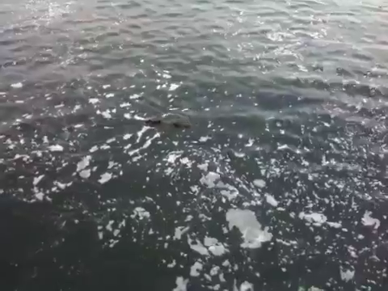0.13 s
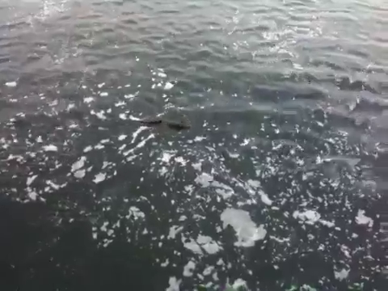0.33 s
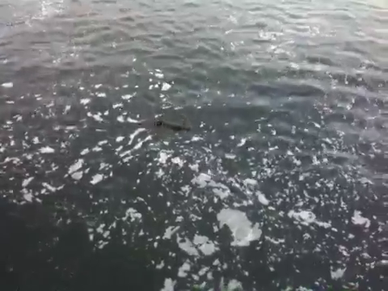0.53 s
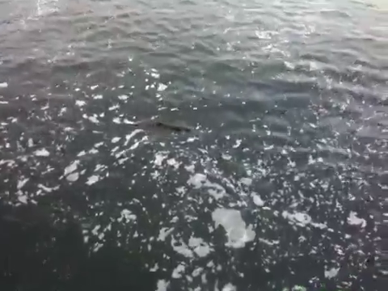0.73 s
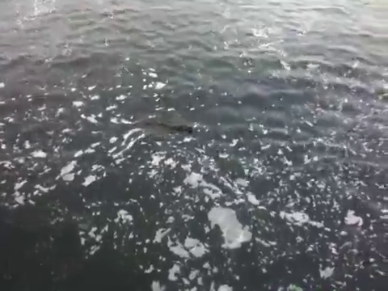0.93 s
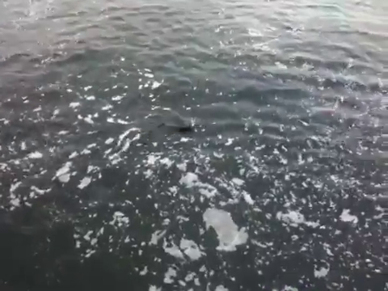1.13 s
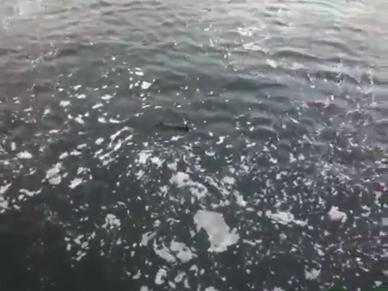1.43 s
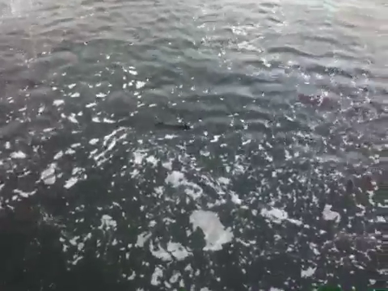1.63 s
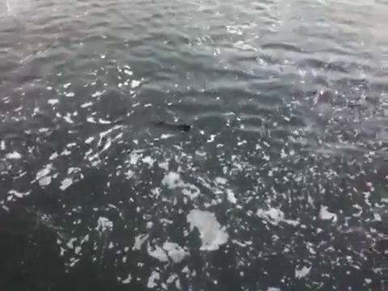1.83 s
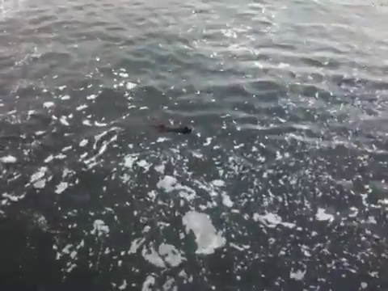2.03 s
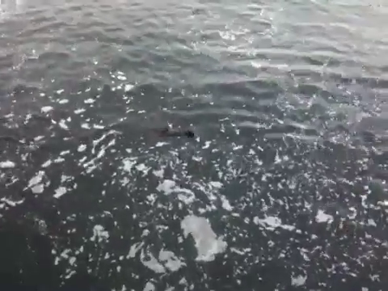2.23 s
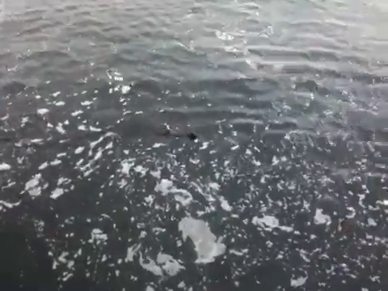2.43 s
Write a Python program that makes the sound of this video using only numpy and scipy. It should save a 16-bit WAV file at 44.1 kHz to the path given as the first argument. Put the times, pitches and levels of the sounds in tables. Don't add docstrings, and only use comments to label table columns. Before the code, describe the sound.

Foamy water trickles and fizzes over a steady dark wash, opening abruptly after 0.1 s silence. Bubble chirps, gurgles and drop ticks crowd until about 1.0 s, densest at 0.55-0.8, then grow sparse as the trickle slowly fades. Soft low laps recur, stronger near 1.0, 2.0 and 2.5. A sharp close plop comes at 2.3. Light wind rumbles, rising at 1.9 and the end; thin, mostly mono, lossy sound.

```python
import sys
import numpy as np
from scipy import signal
from scipy.fft import rfft, irfft
from scipy.io import wavfile
from scipy.ndimage import uniform_filter1d

SR = 44100
rng = np.random.default_rng(int(sys.argv[2]) if len(sys.argv) > 2 else 0)


def field_ratio(decibels):
    return 10 ** (np.asarray(decibels, dtype=float) / 20)


def transcribe(signal):
    frames = np.atleast_2d(signal).T
    limited = np.clip(frames, -1, 1)
    pcm = np.round(limited * 32767).astype(np.int16)
    wavfile.write(sys.argv[1], SR, pcm)


N = 114660

# (time [s], level [dB])
TRICKLE_FLOW = [(.09, -59.5), (.28, -60.5), (.5, -59.5), (.68, -59), (.95, -59.5), (1.05, -60),
                (1.35, -60.5), (1.55, -61.5), (2., -62), (2.6, -62.5)]
# (frequency [Hz], density [dB per Hz])
TRICKLE_COLOUR = [(900, -13.5), (1700, -3), (2300, 1), (3100, -6.5), (5500, -11.5), (9500, -17.5),
                  (12500, -29), (15700, -24)]
# (time [s], peak level [dB], pitch [Hz], upward glide [share of pitch])
LARGE_BUBBLES = [(0.1163, -36, 2000, .03), (0.1367, -35, 2340, .03), (0.187, -31, 2240, .01),
                 (0.252, -34, 2030, .03), (0.2969, -37, 2140, .03), (0.4404, -32, 2650, -.06),
                 (0.545, -36, 2100, .04), (0.5723, -34, 2150, .06), (0.5957, -36, 1880, -.03),
                 (0.6147, -36, 2050, .05), (0.624, -35, 2600, .08), (0.66, -37, 2050, .06),
                 (0.6754, -32, 2090, .06), (0.7179, -33, 2620, -.03), (0.7544, -33.5, 1940, .02),
                 (0.763, -36, 2050, .03), (0.7954, -32, 2670, .04), (0.799, -35, 1650, -.05),
                 (0.806, -35, 2100, .12), (0.9445, -34, 2400, -.03), (0.9524, -31, 2100, .02),
                 (1.0272, -38, 1940, .02), (1.2444, -40, 2330, .02), (1.6094, -38, 2880, .02)]
# (time [s], peak level [dB], pitch [Hz], upward glide [share of pitch])
SMALL_BUBBLES = [(0.1178, -41, 6170, 0.022), (0.1336, -33.5, 5900, .0), (0.134, -40, 6400, -.04),
                 (0.134, -43, 5200, .0), (0.243, -43, 5800, .03), (0.2975, -45, 6700, .04),
                 (0.3157, -40, 6400, -.04), (0.334, -39, 6100, -.02), (0.3346, -38, 5640, .03),
                 (0.3514, -40, 5930, .0), (0.5713, -43, 7040, -.1), (0.6265, -36, 6600, .05),
                 (0.683, -43, 7000, .0), (1.2597, -39, 6460, .0), (1.3643, -43, 6000, .0),
                 (2.2792, -41, 6500, .03)]
# (time [s], peak level [dB], centre [Hz])
DROP_TICKS = [(0.119, -53, 9710), (0.3212, -44, 9500), (0.3324, -49, 7800), (0.4544, -44, 7200),
              (0.6623, -40, 8000), (0.673, -41, 7870), (0.678, -49, 8300), (0.6827, -50, 7340),
              (0.823, -40, 7670), (1.1644, -50, 8300), (1.265, -42.5, 7680), (1.6432, -49, 7780),
              (2.2942, -48, 8000), (2.3034, -46, 7210), (2.4, -53, 10000), (2.4174, -59, 7000)]
# (time [s], level [dB])
GURGLE_LEVEL = [(.09, -54.5), (.3, -56), (.42, -57.5), (.55, -57), (.7, -57), (.96, -57), (1.05, -61.5),
                (1.5, -60), (2.6, -65)]
# (time [s], level [dB])
SPRAY_LEVEL = [(.09, -67.5), (.28, -69), (.5, -65), (.68, -66), (1.35, -68), (1.6, -68.5), (1.85, -69),
               (1.98, -73.5), (2.25, -74), (2.6, -70)]
# (frequency [Hz], density [dB per Hz])
SPRAY_TINT = [(10500, -25.5), (12000, -13), (14000, -7), (15000, -4), (15700, 1)]
# (time [s], level [dB], centre [Hz])
WAVE_LAPS = [(.11, -46.5, 546), (.34, -49.5, 298), (.55, -55, 260), (.97, -44, 332), (1.03, -47, 372),
             (1.29, -55.5, 297), (1.42, -51, 320), (1.62, -54, 345), (1.71, -63, 730), (1.795, -55, 430),
             (2.02, -49, 394), (2.24, -63, 290), (2.35, -52, 375), (2.45, -60, 282), (2.5, -43, 354),
             (2.56, -57, 850)]
# (time [s], level [dB], centre [Hz])
SMALL_SPLASHES = [
    (.33, -55.5, 6000),
    (.46, -63, 7550),
    (.63, -57, 4400),
    (.67, -56.5, 7500),
    (1.265, -61, 6500),
    (2.305, -57, 7000),
]
# (time [s], level [dB])
WIND_LEVEL = [(0.09, -41), (0.3, -46), (0.33, -50.5), (1.86, -52.5), (1.86, -43.5), (2.56, -49), (2.6, -33)]
# (frequency [Hz], density [dB per Hz])
WASH_COLOUR = [(220, -2.5), (730, -7.5), (2200, -13), (3000, -16.5), (4400, -17), (5400, -21.5),
               (8200, -26), (12000, -48.5)]
# (centre time [s], low edge [Hz], high edge [Hz],
# level [dB])
SIDE_FLICKERS = [
    (0.2572, 8300, 9600, -33),
    (1.3481, 6200, 7620, -28),
    (1.742, 4640, 5680, -25),
    (2.1374, 6200, 7540, -26),
]
# (start [s], length [s])
BASS_DROPOUTS = [(.118, .023), (.234, .023), (.303, .046), (.419, .07), (.605, .023), (.652, .07),
                 (.791, .023), (.907, .046), (1.023, .07), (1.139, .116), (1.371, .07), (1.511, .186),
                 (1.72, .163), (1.905, .07), (1.998, .023), (2.045, .023), (2.091, .023), (2.161, .023),
                 (2.207, .023), (2.277, .07), (2.44, .07), (2.532, .023)]

TOP_HZ = 15735


def evened(x):
    return x / np.sqrt(np.mean(x ** 2) + 1e-20)


def blur(x, rows, columns):
    return uniform_filter1d(uniform_filter1d(x, size=columns, axis=1), size=rows, axis=0)


def colour_db(points, hz):
    f, db = np.transpose(points)
    return np.interp(np.log(hz + 1), np.log(f + 1), db)


def level_db(points):
    s, db = np.transpose(points)
    return np.interp(np.arange(N) / SR, s, db)


def add(mix, s, sound):
    part = mix[round(s * SR):][:len(sound)]
    part += sound[:len(part)]


def resonate(x, hz, width_hz):
    turn = np.exp(2j * np.pi * hz * np.arange(len(x)) / SR)
    r = np.exp(-np.pi * width_hz / SR)
    once = signal.lfilter([1 - r], [1, -r], x / turn)
    twice = signal.lfilter([1 - r], [1, -r], once)
    return 2 * (turn * twice).real


def hiss(colour, patchy_db, flicker_db):
    frames = N // 128 + 5
    real, imaginary, patches = rng.standard_normal((frames, 257, 3)).T
    patches = evened(blur(patches, 6, 14))
    flicker = evened(uniform_filter1d(rng.standard_normal(frames), size=5))
    spectra = (real + 1j * imaginary) * field_ratio(patchy_db * patches + flicker_db * flicker)
    x = signal.istft(spectra, nperseg=512, noverlap=384)[1][:N]
    tint = field_ratio(colour_db(colour, np.fft.rfftfreq(N, 1 / SR)))
    return evened(irfft(rfft(x) * tint, N))


def bubble(hz, cycles, glide, rise):
    u = np.arange(0, 2 * cycles / hz, 1 / SR) * hz / cycles
    tone = np.sin(2 * np.pi * cycles * u * (1 + glide * (u - .5)))
    return np.minimum(u / rise, 1) * np.exp(-2.5 * u) * tone


def bubble_cloud(per_s, spread_db, most, pitches, grain):
    size = field_ratio(spread_db * np.minimum(rng.exponential(1, N), most)) * (rng.random(N) < per_s / SR)
    kind, out = rng.integers(0, len(pitches), N), np.zeros(N)
    for k, hz in enumerate(pitches):
        out += signal.oaconvolve(size * (kind == k), grain(hz))[:N]
    return evened(out)


def trickle():
    def grain(hz):
        return field_ratio(colour_db(TRICKLE_COLOUR, hz)) * hz * bubble(hz, 2.44, 0.082, 0.25)

    fizz = bubble_cloud(1400, 1, 5, np.geomspace(1400, 14000, num=24), grain)
    flow = field_ratio(2.43 * (level_db(TRICKLE_FLOW) + 61.5))
    return flow * (field_ratio(-56) * hiss(TRICKLE_COLOUR, patchy_db=2.0, flicker_db=0.5) + field_ratio(-58.5) * fizz)


def chirps():
    out = np.zeros(N)
    for table, ring_s, trim_db in ((LARGE_BUBBLES, .008, -8.5), (SMALL_BUBBLES, .0065, -10)):
        for s, db, hz, glide in table:
            add(out, s, field_ratio(db + trim_db) * 2 * bubble(hz, hz * ring_s, glide, 0.2))
    return out


def drops():
    out, t = np.zeros(N), np.arange(600) / SR
    for s, db, hz in DROP_TICKS:
        puff = evened(resonate(rng.standard_normal(len(t)), hz, 3600))
        add(out, s, field_ratio(db - 6.5) * np.exp(-t / .002) * puff)
    plop_s, crack_s = 2.2945, .00022
    add(out, plop_s, field_ratio(-36) * bubble(2230, 3.2, 0.3, 0.07))
    u = t / crack_s
    add(out, plop_s, field_ratio(-23) * np.minimum(u * 2, 1) ** 2 * (1 - u) * np.exp(-u))
    return out


def gurgle():
    def grain(hz):
        return bubble(hz, 15, 0.059, 0.28)

    return field_ratio(level_db(GURGLE_LEVEL)) * bubble_cloud(260, 2.6, 4, np.geomspace(1920, 2400, num=16), grain)


def spray():
    return field_ratio(level_db(SPRAY_LEVEL) + 6) * hiss(SPRAY_TINT, patchy_db=2.5, flicker_db=1.5)


def laps():
    out, t = np.zeros(N), np.arange(-2000, 2000) / SR
    for table, swell_s, width_hz in ((WAVE_LAPS, .018, 450), (SMALL_SPLASHES, .015, 4000)):
        for s, db, hz in table:
            noise = evened(resonate(rng.standard_normal(len(t)), hz, width_hz))
            add(out, s + t[0], field_ratio(db) * np.exp(-(t / swell_s) ** 2) * noise)
    return out


def wind():
    return field_ratio(level_db(WIND_LEVEL) - 9.5) * evened(resonate(rng.standard_normal(N), 235, 400))


def wash():
    return field_ratio(-43) * hiss(WASH_COLOUR, patchy_db=0.89, flicker_db=0.46)


def scene():
    mid = wash() + trickle() + chirps() + drops() + wind() + gurgle() + spray() + laps()
    return np.array([mid, mid])


def side_flickers(s, hz):
    out = np.zeros((len(s), len(hz)))
    for at_s, low_hz, high_hz, db in SIDE_FLICKERS:
        noise = rng.standard_normal(len(hz))
        out[np.argmin(abs(s - at_s))] = field_ratio(db) * noise * (hz > low_hz) * (hz < high_hz)
    return out


def thin_detail(x):
    size = 1024
    lead = 2 * size - 576
    n, k = np.arange(2 * size), np.arange(size)
    window = np.sin(np.pi * (n + .5) / (2 * size))
    basis = np.cos(np.pi / size * np.outer(n + .5 + size / 2, k + .5)) * window[:, None]
    at = np.arange(N // size + 4)[:, None] * size + n
    bins = np.pad(x, (lead, 6 * size))[at] @ basis
    s, hz = (at[:, size] - lead) / SR, (k + .5) * SR / (2 * size)

    near = np.sqrt(abs(blur(bins ** 2, 3, 32)))
    fine = np.minimum(field_ratio(-30.7), field_ratio(9.3) * near + 1e-9)
    coarse = field_ratio(6.5) * near * np.clip(hz / 10800, 0, 1) ** 3
    wander, leak = rng.standard_normal((2, *bins.shape))
    step = np.maximum(fine, coarse) * field_ratio(.7 * evened(blur(wander, 4, 24)))
    kept = np.sign(bins) * step * np.floor((abs(bins) / step) ** 0.72 + 1 - .68) ** (4 / 3)

    kept += field_ratio(-21) * leak * np.sqrt(abs(blur(kept ** 2, 3, 7)))
    kept[:, hz > TOP_HZ] = 0
    for start_s, length_s in BASS_DROPOUTS:
        kept[(s > start_s) & (s < start_s + length_s), :8] *= field_ratio(-38)

    side, out = side_flickers(s, hz), np.zeros((2, at.max() + 1))
    for channel, part in zip(out, (kept + side, kept - side)):
        np.add.at(channel, at, part @ basis.T * 2 / size)
    return out[:, lead:lead + N]


def snap(x):
    t = np.arange(N) / SR - .5683
    tick = evened(resonate(rng.standard_normal(N), 11000, 9000))
    tick *= field_ratio(-50) * (t >= 0) * np.exp(-abs(t) / .0009)
    tick = signal.oaconvolve(tick, signal.firwin(127, TOP_HZ - 400, fs=SR), "same")
    top_band = signal.firwin(255, [10800, TOP_HZ - 700], pass_zero=False, fs=SR)
    treble = signal.oaconvolve(x, top_band[None], "same")
    hush = (1 - field_ratio(-13)) * np.exp(-(t / .011) ** 4)
    return x - treble * hush + tick


def roll_off(x):
    return signal.sosfilt(signal.butter(12, 16390, fs=SR, output="sos"), x)


def record(dry):
    bass_cut = signal.butter(4, 149.4, "high", fs=SR, output="sos")
    thin = signal.sosfilt(bass_cut, dry.mean(0))
    band_limit = signal.firwin(511, TOP_HZ + 150, window=("kaiser", 9), fs=SR)
    limited = signal.oaconvolve(thin, band_limit, "same")
    start_s, fade_s = .0838, .0003
    opening = np.clip((np.arange(N) / SR - start_s) / fade_s, 0, 1)
    return roll_off(snap(thin_detail(limited)) * opening)


dry = scene()
out = record(dry)
transcribe(out)
```